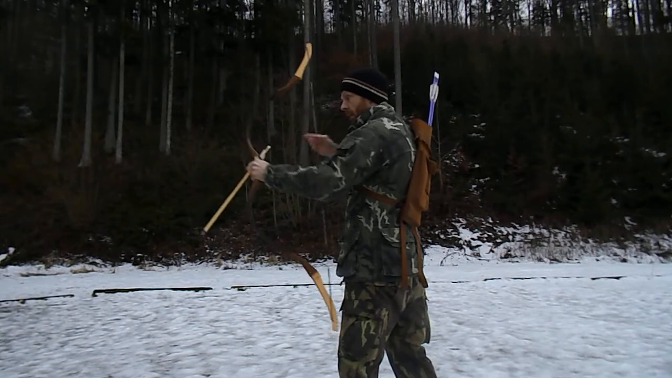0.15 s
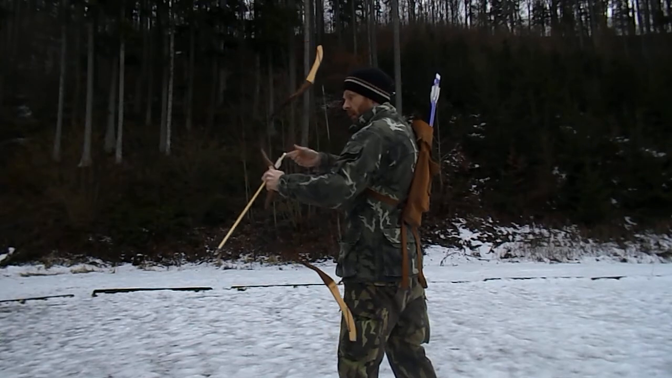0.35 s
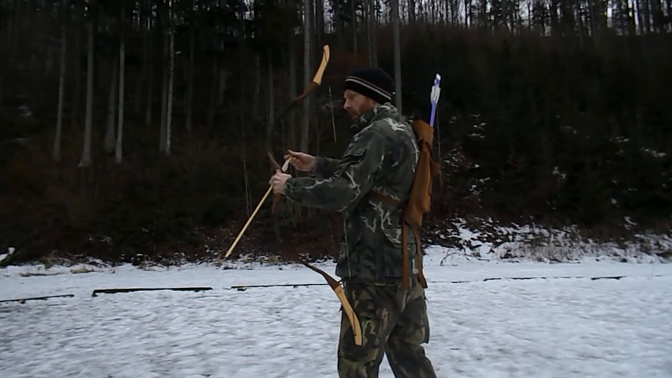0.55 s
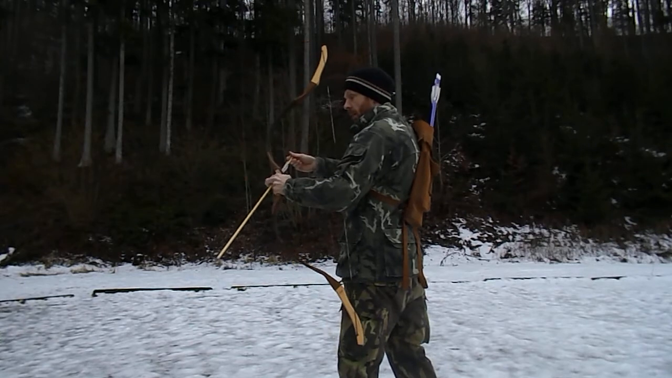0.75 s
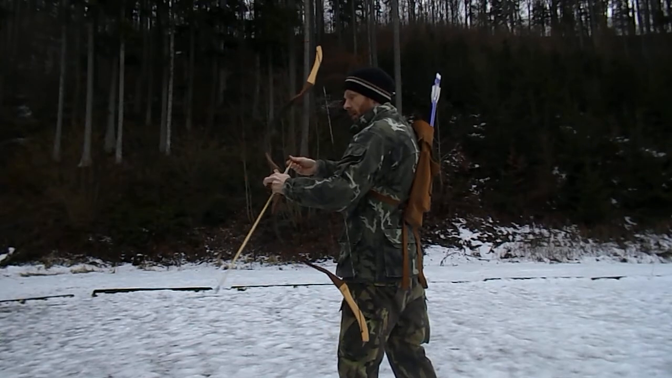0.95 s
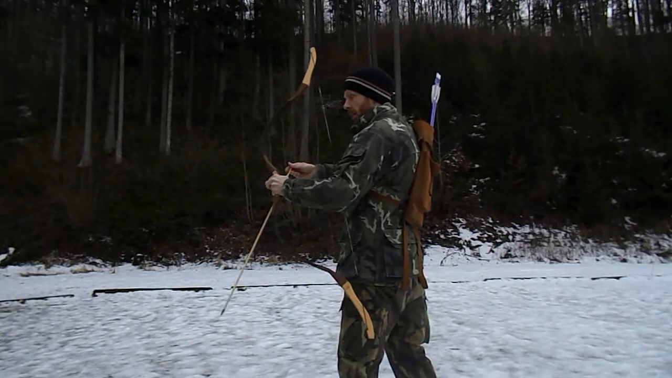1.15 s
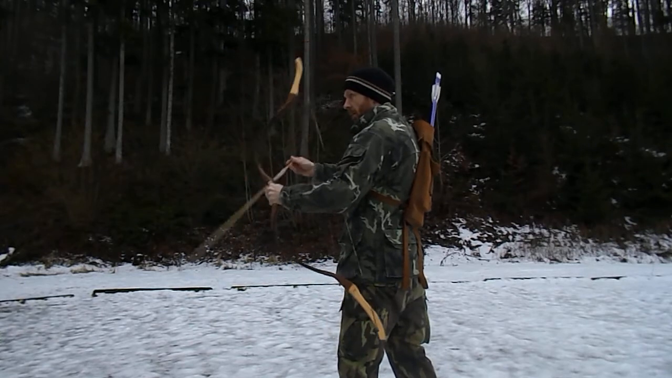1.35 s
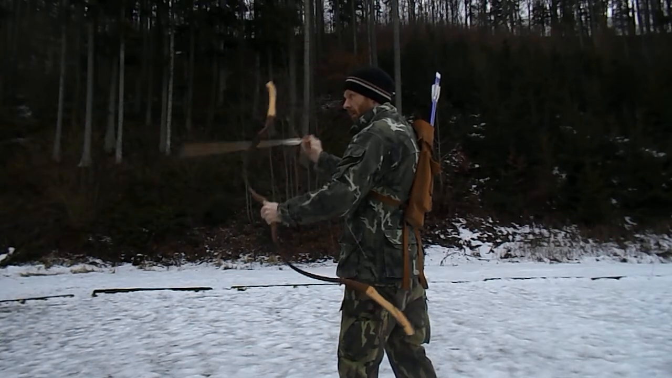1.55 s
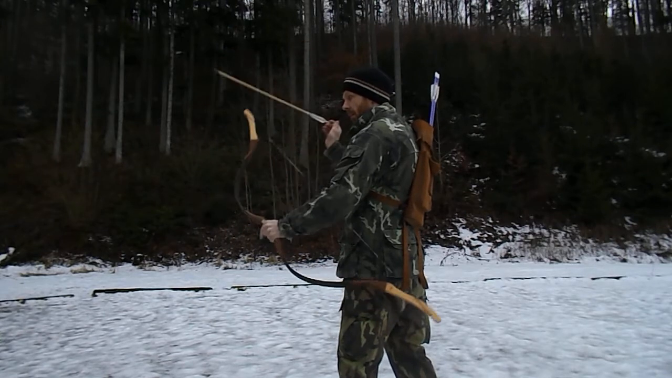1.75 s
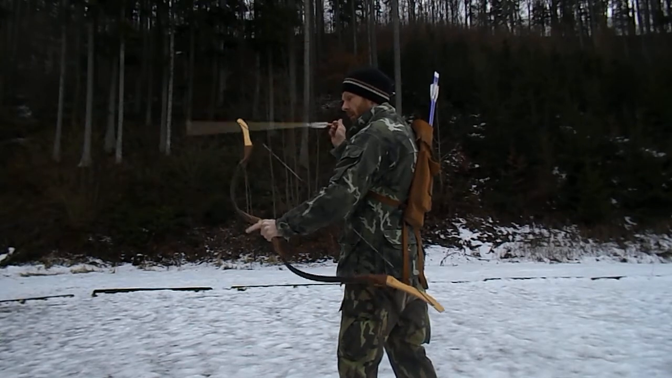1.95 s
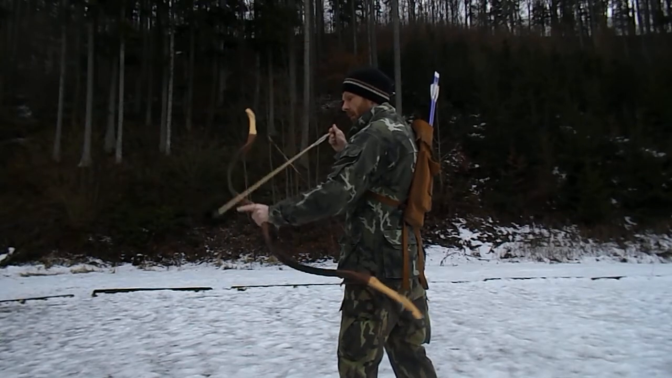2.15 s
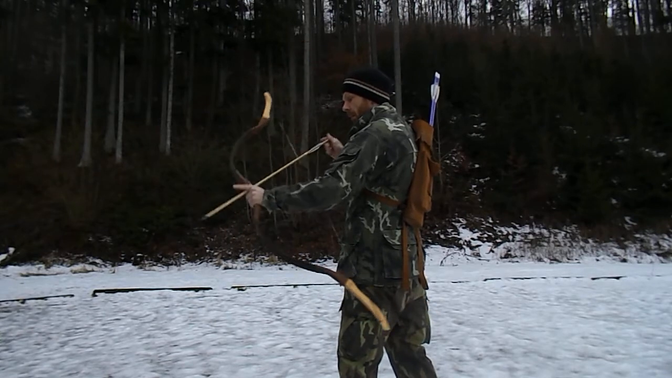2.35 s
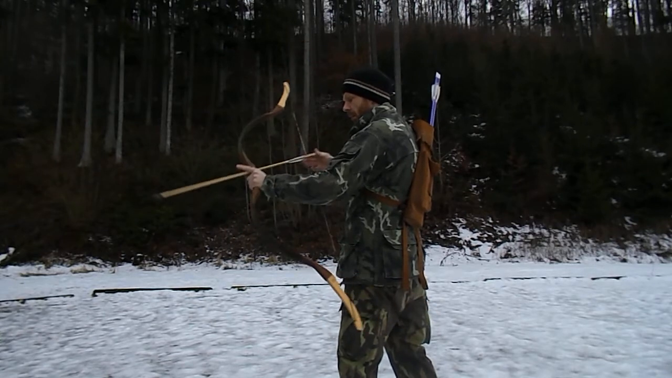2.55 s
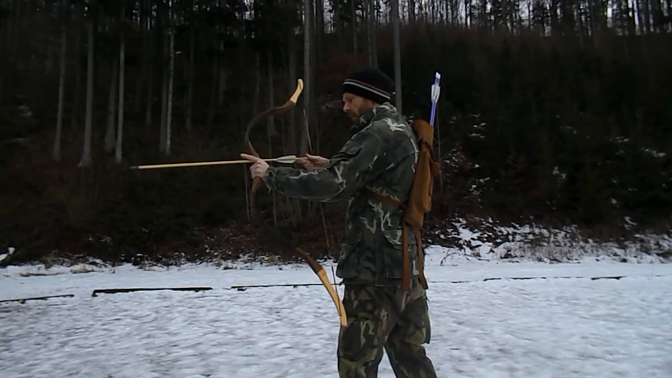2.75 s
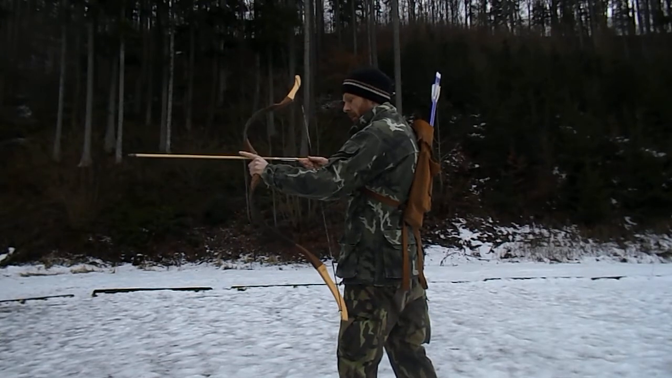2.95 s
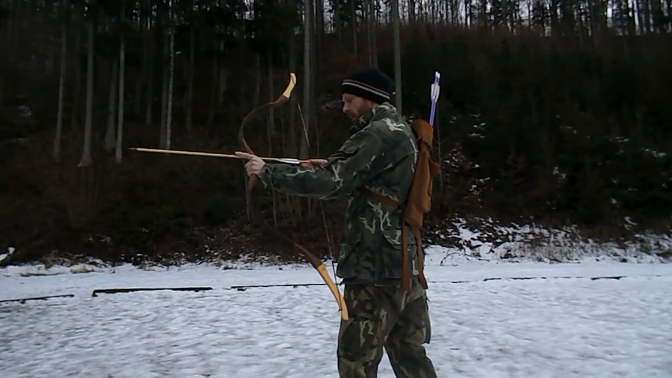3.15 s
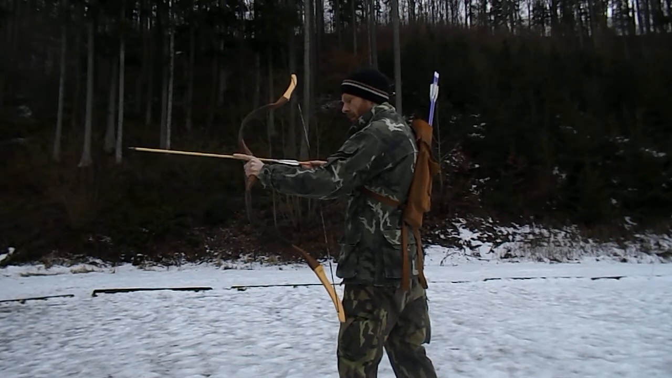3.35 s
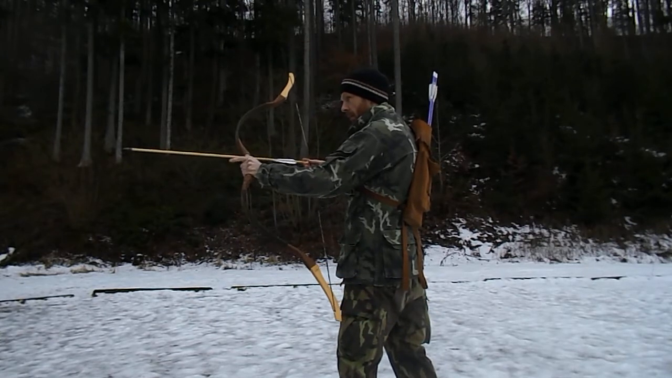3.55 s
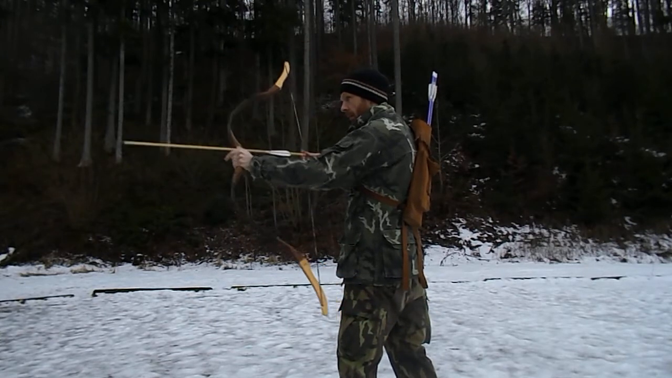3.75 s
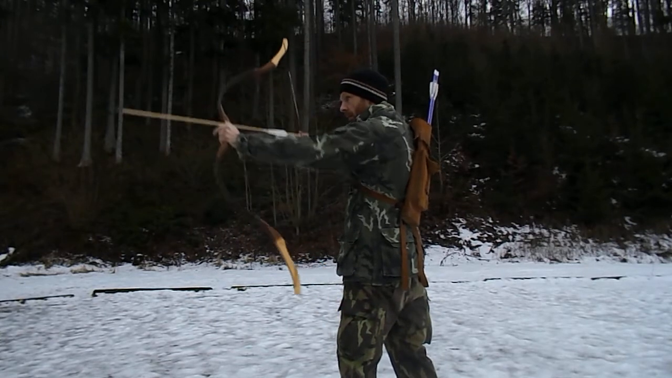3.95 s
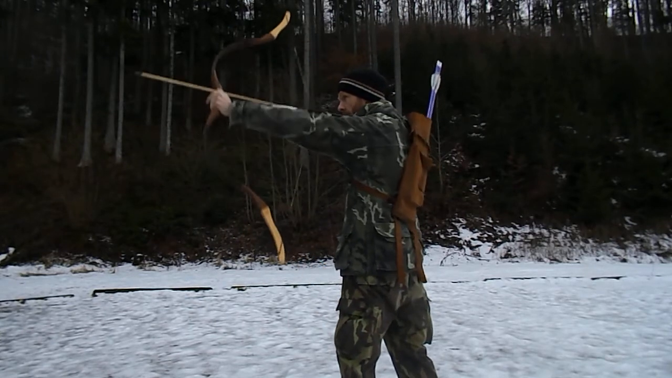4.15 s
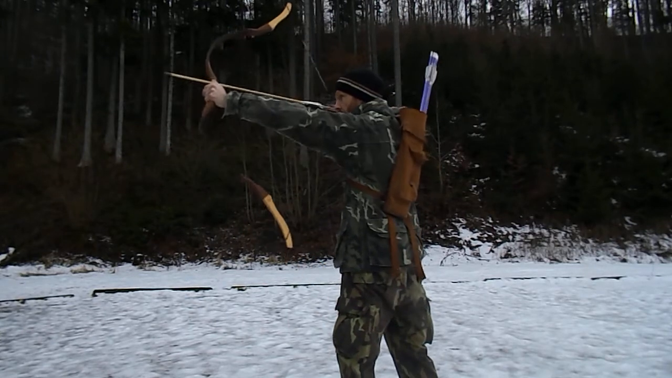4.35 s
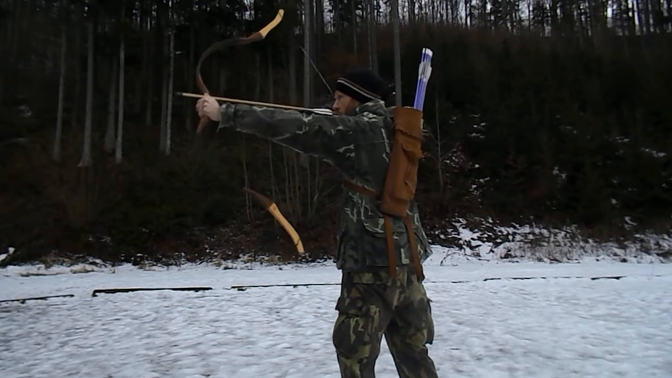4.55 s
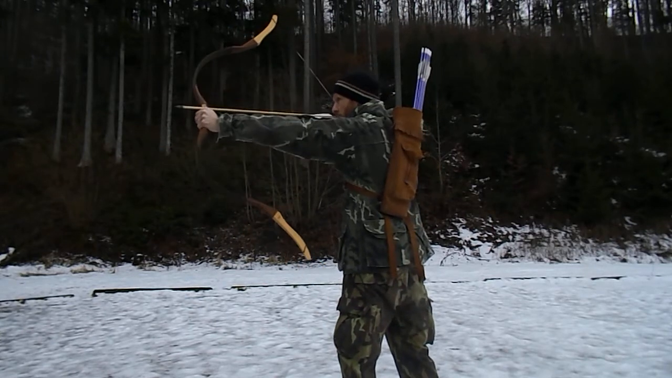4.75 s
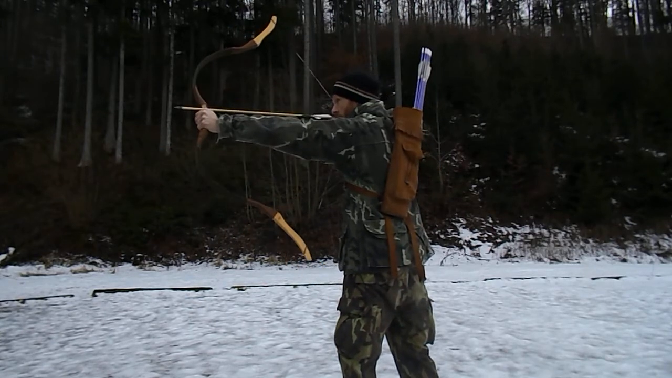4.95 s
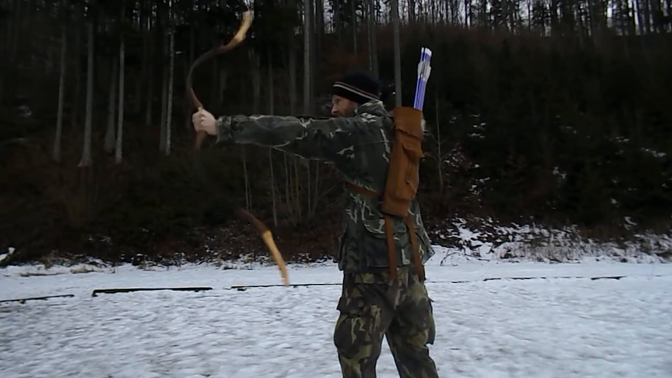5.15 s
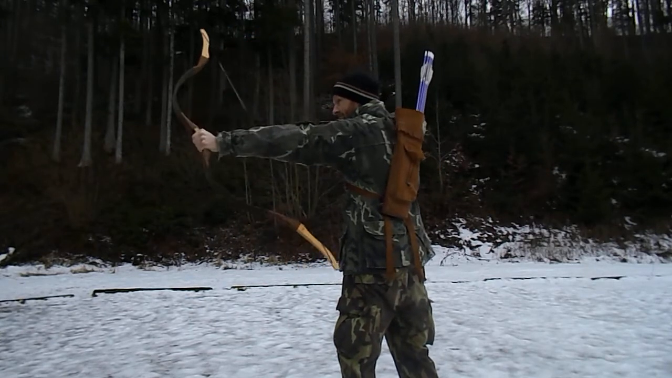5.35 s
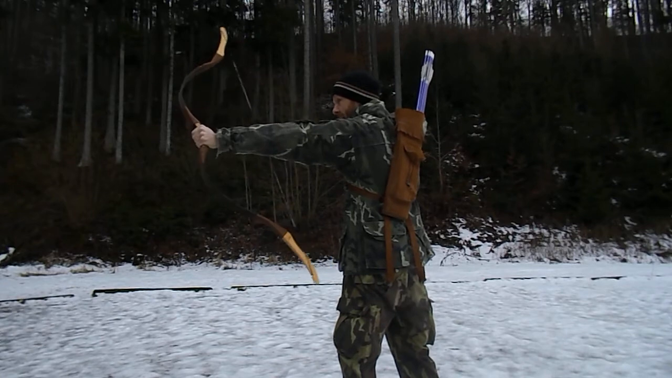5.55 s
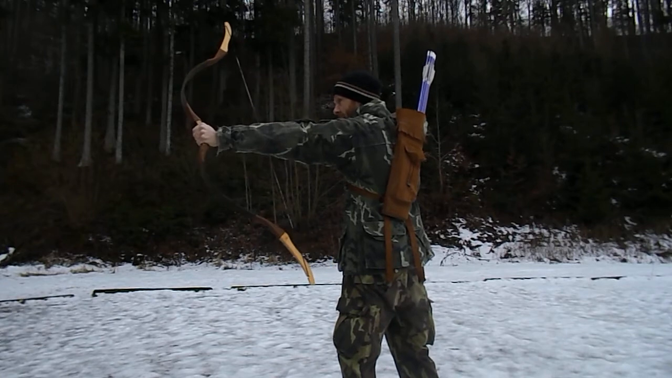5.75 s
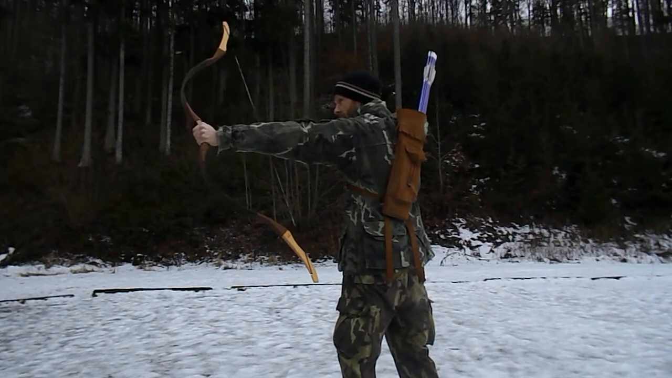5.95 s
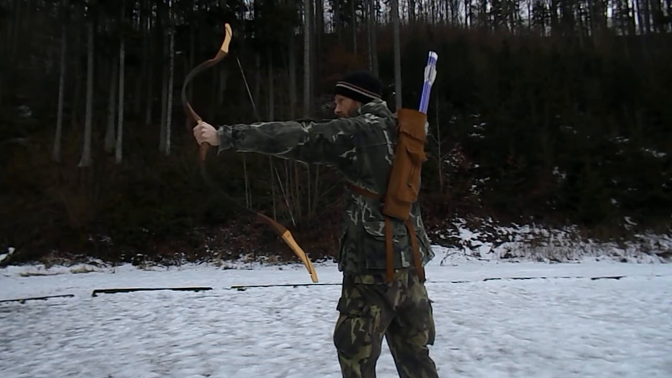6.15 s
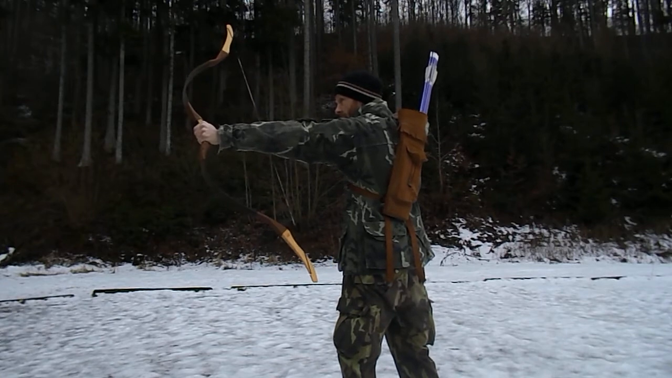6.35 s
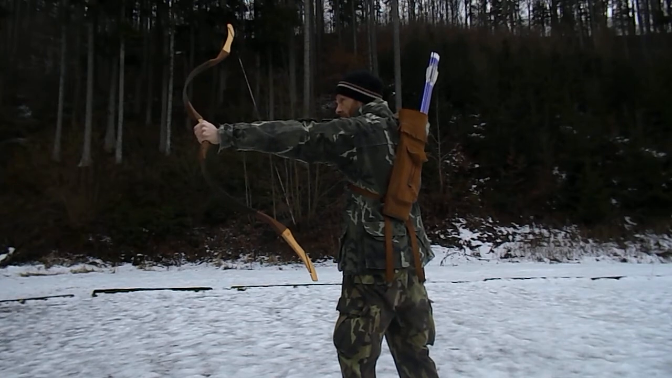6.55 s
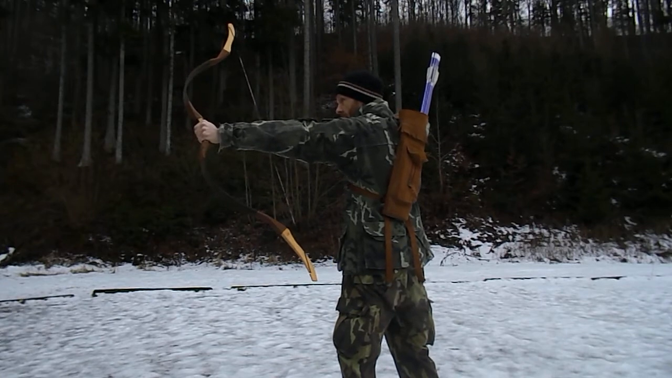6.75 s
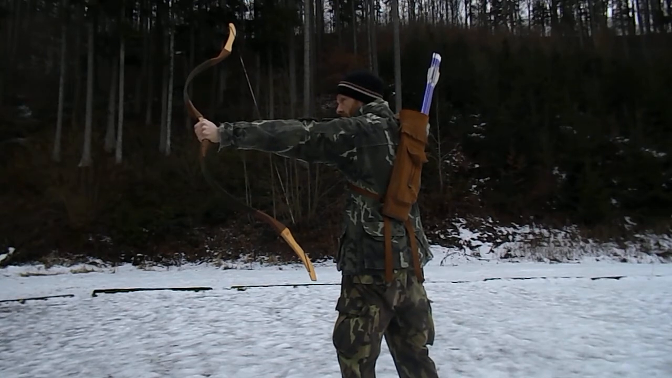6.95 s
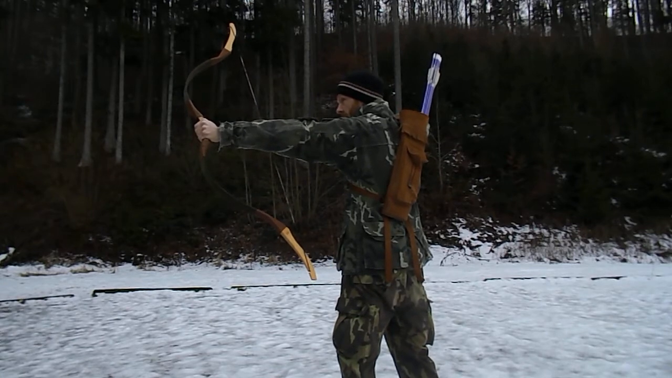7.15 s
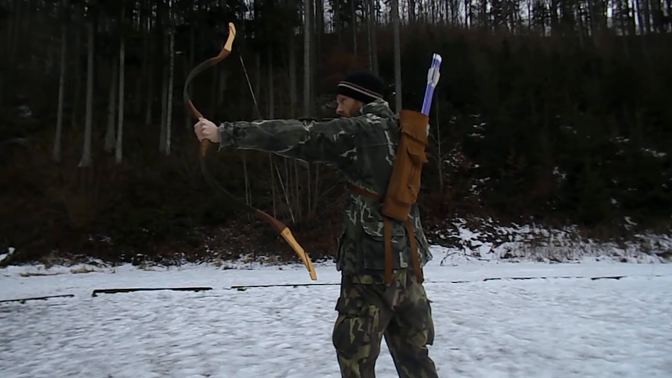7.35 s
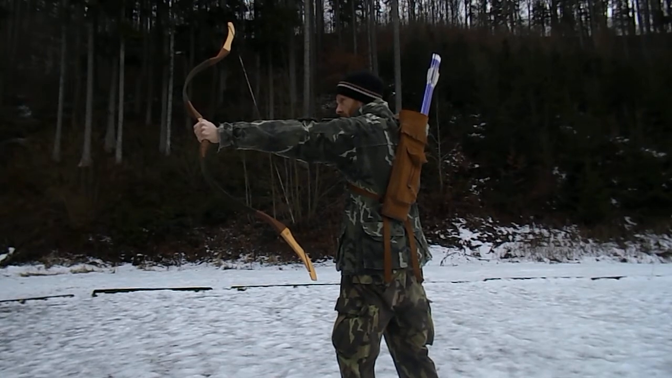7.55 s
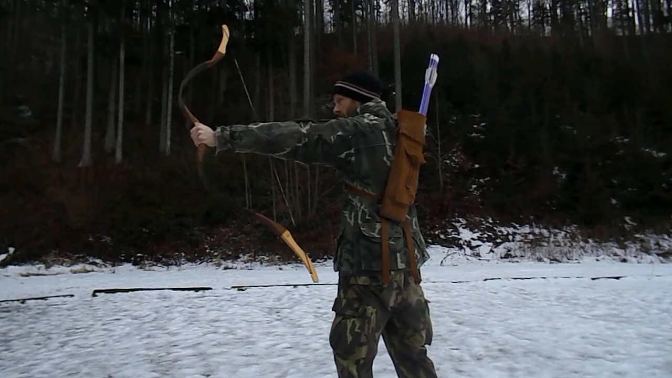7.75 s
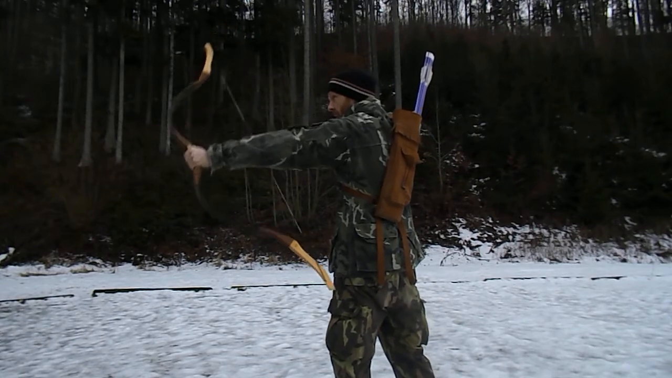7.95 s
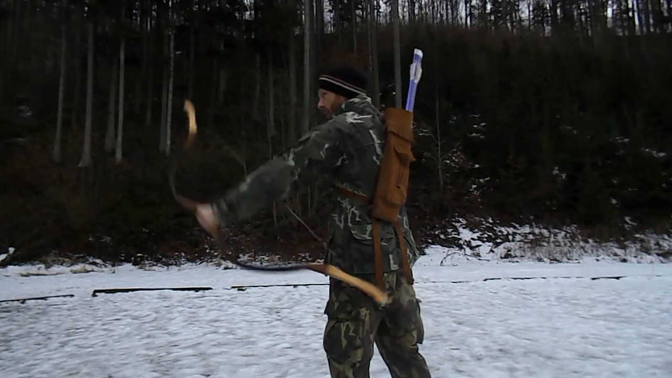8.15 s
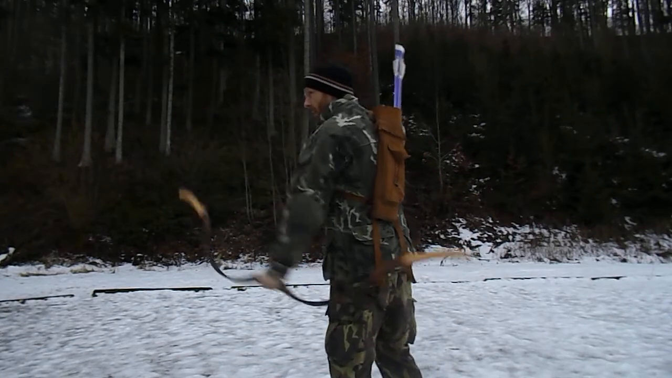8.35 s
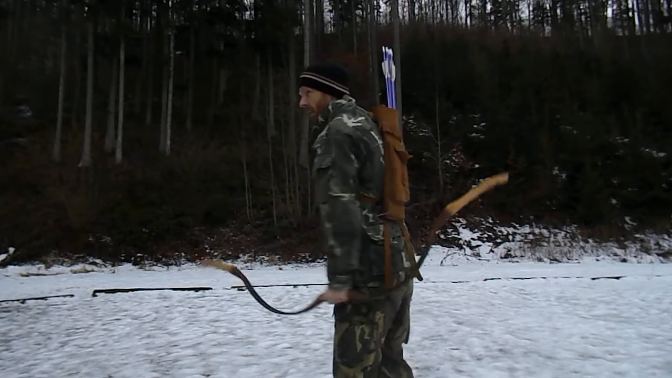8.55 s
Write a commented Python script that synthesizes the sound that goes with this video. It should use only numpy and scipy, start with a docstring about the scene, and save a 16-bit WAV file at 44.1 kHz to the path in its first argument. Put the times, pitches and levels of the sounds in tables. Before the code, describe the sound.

Soft, steady air rush and camera hiss last throughout, in an open place beside woods. Near 0.9 s comes a faint wooden tap with dull low bumps on the camera; a weak buzzy bird note at 1.5 s and more soft bumps toward 2 s. At 2.25 s the arrow shaft clacks crisply on the bow with smaller knocks right after, then tiny nock clicks and feather rustle at 2.4-2.8 s. From 3.3 to 5.4 s a distant bird alternates a thin, high whistle and a short trilled buzz, over slight clothing rustles. At about 5.2 s the string slaps the limbs in a very loud, sharp, woody snap; at 5.27 s the arrow thuds into a close target and rattles out by 5.45 s, leaving a faint woodland tail. Faint pips and rustles follow at 6.2-7.7 s; the bird returns from 8 s, with a brighter rustle at 8.55 s.

```python
"""Air and camera hiss run throughout at a snowy forest edge. At first an archer's wooden arrow knocks on the bow and dull
bumps hit the camera. A far bird starts repeating its two notes, made of gliding sine waves; nock, feathers and clothes
click and rustle, made of short noise bursts. Then the string slaps the recurve bow's limbs, and the arrow thuds into
a target close by and rattles: both are runs of contacts that ring resonances. Faint pips, rustles and the bird follow."""
import sys
import numpy as np
from scipy import signal
from scipy.fft import rfft, irfft, next_fast_len
from scipy.io import wavfile
from scipy.ndimage import uniform_filter1d, map_coordinates

SR = 44100
rng = np.random.default_rng(int(sys.argv[2]) if len(sys.argv) > 2 else 0)


def store_wav(level_fs):
    """Save 16-bit WAV to argv[1]."""
    pcm = np.round(np.clip(np.atleast_2d(level_fs), -1, 1) * 32767)
    wavfile.write(sys.argv[1], SR, pcm.T.astype(np.int16))


N = 383096  # length in samples

# Colour of the air and hiss: (f/Hz, relative level/dB)
AIR_COLOUR = [(26, -78), (45, -48), (62, -25.5), (114, -24), (146, -14), (408, -1), (895, -4.5),
              (963, -2.5), (1060, -7), (1290, -5.5), (1500, -9), (4510, -14.5), (10400, -17.5),
              (15700, -20)]
# How alike left and right are in the air: (f/Hz, likeness from 0 to 1)
AIR_LIKENESS = [(60, .65), (180, .37), (550, .5), (1650, .29), (3200, .05), (4500, 0)]
# How far the air leans to the left: (f/Hz, left minus right level/dB)
AIR_LEAN = [(60, 4), (240, 1), (950, 3), (3770, 1), (15000, 0.5)]
# How long the trees' answer lasts: (f/Hz, time to fall 60 dB/s)
WOODS_DECAY = [(200, 0.53), (1000, 0.65), (4000, 0.86), (12000, 0.45)]
# The bird's clear note: (end of its loud part t/s, level/dB, settled f/Hz, length of loud part/s)
WHISTLES = [(3.305, -57.5, 4250, .015), (3.824, -57, 4280, 0.067), (4.295, -53, 4230, 0.042),
            (4.792, -46.5, 4235, 0.035), (8.006, -55, 4240, 0.013), (8.5, -47.5, 4240, 0.021)]
# The bird's buzzy note: (t/s, starting f/Hz, level/dB)
BUZZES = [(1.52, 4820, -53), (3.455, 4930, -52), (3.945, 4840, -50), (4.427, 4930, -46.5),
          (4.93, 4700, -48), (5.43, 4750, -53), (8.152, 4750, -52.5), (8.625, 4780, -46.5)]
# Dull bumps at the camera: (t/s, level/dB, push length/s)
BUMPS = [(0.962, -32.5, 0.00044), (0.982, -43, .0007), (1.729, -47, 0.0013), (1.973, -56, .0013),
         (2.01, -51, .0014)]
# Thin clicks of nock and feathers: (t/s, level/dB)
CLICKS = [(2.392, -31), (2.551, -32), (2.565, -30), (2.5735, -29), (2.603, -26), (2.611, -29), (2.687, -32)]
# Soft rustles of feathers and clothes: (t/s, level/dB, time to fall 60 dB/s, centre f/Hz)
RUSTLES = [(1.475, -46, .04, 10500), (2.50, -48.5, .5, 8400), (2.655, -43, .11, 8450),
           (2.695, -28.5, .04, 7740), (2.731, -42.5, .12, 7000), (3.305, -42, .04, 3600),
           (3.522, -42.5, .048, 8300), (3.895, -43.5, .047, 11000), (4.545, -36, .16, 4360),
           (5.065, -40, .04, 5480), (6.30, -45.5, .05, 9730), (7.172, -44.5, .088, 11000),
           (7.722, -46, .064, 9300), (8.5464, -27.5, .038, 7000)]
# Faint narrow pips: (t/s, level/dB, centre f/Hz)
PIPS = [(6.262, -46, 2400), (6.597, -39.5, 3350), (6.656, -45, 2280), (6.829, -44, 3200)]
# The arrow's shaft knocking on the bow:
# (t/s, level/dB, time to fall 60 dB/s, treble level/dB, grip as a factor on the shaft's widths)
KNOCKS = [(0.931, -44, 0.022, -20, 0.82), (2.242, -17, 0.0054, 1, 0.71), (2.3109, -22, 0.02, -3, 1.2),
          (2.337, -31, .008, -6, 1.4), (2.6994, -34.5, 0.045, -8, 2.2), (2.7567, -38.5, 0.0061, 13, 5.4)]
# Resonances of the wooden shaft: (f/Hz, width before the grip/Hz, level/dB)
SHAFT_MODES = [(567, 126, -1), (883, 43, 4), (1340, 86, -2.5), (1590, 86, -2), (2180, 1140, -0.5),
               (2790, 49, 7.5), (3090, 130, 0.5)]
# The string slips off the fingers, slaps the limbs and rebounds, one row for each run of contacts:
# (t/s, peak level/dB, build-up/s, swell/dB, settling time/s, length/s, thump level/dB, treble level/dB)
STRING_SLAPS = [(5.161, -18.5, 0.011, 18, 0.0068, 0.021, 2.5, -2),
                (5.1862, 1.5, .0012, 8, 0.002, .010, -11, -4), (5.196, -13.5, 0.0027, 8, 0.015, .058, 7, 2)]
# Resonances of limbs and riser: (f/Hz, width/Hz, level/dB)
BOW_MODES = [(322, 35, 7.5), (447, 92, 2), (550, 65, 1), (656, 160, -3), (829, 45, 9), (1130, 51, 6.5),
             (1270, 70, 6.5), (1700, 220, 6), (2294, 106, 11), (2420, 140, 10), (2690, 300, 6.5),
             (3170, 260, 7.5), (3840, 1070, 5), (5540, 580, -17)]
# The arrow tears into the target, then its shaft shakes:
# (t/s, peak level/dB, build-up/s, swell/dB, settling time/s, length/s, thump level/dB, treble level/dB)
TARGET_HITS = [(5.2697, -3, 0.0041, 8, .005, 0.056, 6, 11),
               (5.327, -18.5, .008, 26, 0.0072, 0.028, -15, 13.5),
               (5.368, -41, 0.0036, 8, .01, .016, -12, 13), (5.397, -46, .002, 6, .006, .012, -12, 0),
               (5.4126, -38.5, .0005, 5.1, .004, 0.014, 1, 13.5)]
# Resonances of the target: (f/Hz, width/Hz, level/dB)
TARGET_MODES = [(301.6, 100, -2.5), (357, 115, 5.5), (470, 240, 0), (614, 126, 3), (890, 180, -6),
                (1196, 120, 4), (1620, 120, 1), (1860, 165, -6.5), (2940, 730, 3.5), (4800, 900, 4)]

AIR_DB = -49.5
# The whistle swells to its loud part, drops, then lingers faintly.
NOTE_RISE_S, NOTE_RISE_DB = 0.055, 20
NOTE_CUT_S, NOTE_CUT_DB = 0.027, 10
NOTE_TAIL_S, NOTE_TAIL_DB = 0.11, 5
BUZZ_S = 0.069
CLICK_T60_S, CLICK_HZ, CLICK_WIDTH_HZ = 0.006, 7500, 15000
RUSTLE_WIDTH = 0.55  # share of the centre frequency
PIP_T60_S, PIP_WIDTH_HZ = 0.047, 320
KNOCK_THUMP_DB = 9.5
# "Doubling" means each doubling of 1 + time since the peak / settling time.
SETTLE_DB = 11.5  # loss each doubling
FIRST_THUMP_LOSS_DB, THUMP_GROWS_DB = 3, 2.5  # missing at the first contact; gained each doubling
RING_GAPS, RING_S = 3.3, 0.0085  # a contact rattles for this many gaps plus this long
TOP_HZ = 15900  # nothing is kept from here up


def amp(db):
    """Turns dB into a gain."""
    return 10 ** (np.asarray(db) / 20)


def unit(x):
    """Scales a sound to an average (rms) size of 1."""
    return x / np.sqrt(np.mean(x ** 2) + 1e-20)


def along(points, hz):
    """Reads values between (Hz, value) points on a log frequency axis."""
    f, value = np.transpose(points)
    return np.interp(np.log(hz + 1), np.log(f + 1), value)


def filtered(x, response):
    """Multiplies the spectrum of x by a response that depends on frequency."""
    n = np.shape(x)[-1]
    padded = next_fast_len(n + 8192)  # room for ringing past the end
    spectrum = rfft(x, padded) * response(np.fft.rfftfreq(padded, 1 / SR))
    return irfft(spectrum, padded)[..., :n]


def modes(table):
    """Resonances that ring after a push: the narrower, the longer; neighbours have opposite signs."""
    def response(f):
        return sum((-1) ** k * amp(db) * 1j * f * width / (hz * hz - f * f + 1j * f * width)
                   for k, (hz, width, db) in enumerate(table))
    return response


def add(out, x, start_s):
    """Mixes x into out from start_s seconds on."""
    part = out[..., round(start_s * SR):][..., :x.shape[-1]]
    part += x[..., :part.shape[-1]]


def placed(x, lead, pan_db):
    """Puts a sound to one side: the left hears it lead seconds earlier and pan_db louder."""
    side = np.array([[.5], [-.5]])
    return filtered(x, lambda f: amp(pan_db * side) * np.exp(2j * np.pi * f * lead * side))


def puff(t60, rise, spread):
    """A short gritty noise burst that rises and dies; spread is the share that differs left and right."""
    t = np.arange(SR // 5) / SR
    shape = amp(-60 * t / max(t60, .001)) * (1 - np.exp(-t / rise))
    grit = amp(3.5 * np.repeat(rng.standard_normal(len(t) // 20), 20))  # many tiny contacts of uneven size
    noise = rng.standard_normal((3, len(t))) * shape * grit
    noise *= np.linalg.norm(shape) / np.linalg.norm(noise, axis=1, keepdims=True)
    spread = np.clip(spread, 0, 1)
    shared, separate = noise[0], noise[1:]
    return np.sqrt(1 - spread) * shared + np.sqrt(spread) * separate


def struck(blows, body, gain_db, contact, crack_hz, crack_width_hz, spread):
    """Blows ring a body by a rattle and one soft push each, and add a bright crack."""
    out = np.zeros((2, N))
    u = np.arange(SR // 5) / SR / contact  # time counted in contact lengths
    bright = modes([(crack_hz, crack_width_hz, 0)])
    for s, db, t60, push_db, treble_db in blows:
        # every blow wakes the resonances at new strengths
        ring = modes([(hz, width, level + rng.normal(0, 1.5)) for hz, width, level in body])
        rattle = puff(t60, rise=.04 * t60, spread=0.038)
        rattle = filtered(rattle, lambda f: 1j * f / (900 + 1j * f))  # light contacts hardly move low modes
        force = amp(gain_db) * rattle + amp(push_db) * u * np.exp(1 - u)
        crack = amp(treble_db) * puff(t60, rise=0.055 * t60, spread=spread)
        blow = filtered(force, ring) + filtered(crack, lambda f: bright(f) ** 2)
        add(out, amp(db) * blow, s)
    return out


def flurry(runs, count=10):
    """Each run of contacts, spreading ever further apart, swells to a peak and settles."""
    blows = []
    for s, db, build, swell_db, settle, length, thump_db, treble_db in runs:
        steps = np.arange(count + 1) + np.r_[0, rng.uniform(-.4, .4, count)]  # uneven timing
        t = length * (steps / count) ** 2
        early = np.clip(1 - t / build, 0, 1)
        late = np.log2(1 + np.clip(t - build, 0, None) / settle)
        level = db - swell_db * early - SETTLE_DB * late
        push = thump_db - FIRST_THUMP_LOSS_DB * early + THUMP_GROWS_DB * late
        t60 = RING_S + RING_GAPS * np.diff(t)
        blows += [(s + t[k], level[k], t60[k], push[k], treble_db) for k in range(count)]
    return blows


def air():
    """Far rush and camera hiss: noise with faint patches, its lower part partly shared by left and right."""
    z = signal.stft(rng.standard_normal((2, N)), nperseg=512)[2]
    patches = uniform_filter1d(rng.standard_normal(z.shape[1:]), size=8, axis=0)
    patches = unit(uniform_filter1d(patches, size=14, axis=1))
    pair = signal.istft(z * amp(0.75 * patches), nperseg=512)[1][:, :N]

    def colour(hz):
        angle = np.arccos(np.clip(along(AIR_LIKENESS, hz), -1, 1)) / 2
        return amp(along(AIR_COLOUR, hz)) * [np.cos(angle), np.sin(angle)]

    mid, side = filtered(pair, colour)
    both = np.array([mid + side, mid - side])
    both = filtered(both, lambda hz: amp(along(AIR_LEAN, hz) * [[.5], [-.5]]))
    return amp(AIR_DB) * placed(unit(both), lead=.00008, pan_db=-1.5)


def woods(x):
    """The trees answer with a noisy tail in which each frequency dies at its own speed."""
    hz, t, z = signal.stft(rng.standard_normal((2, SR // 2)), SR, nperseg=256)
    fading = z * amp(-60 * t / along(WOODS_DECAY, hz)[:, None])
    tail = signal.istft(fading, SR, nperseg=256)[1]
    late = np.pad(x, (400, 0))[None]  # the answer starts 400 samples late
    return signal.fftconvolve(late, tail / np.linalg.norm(tail[0]), axes=1)[:, :N]


def whistles():
    """The clear note is a sine wave that slides up to its pitch and wavers."""
    out = np.zeros(N)
    for peak_s, peak_db, hz, hold in WHISTLES:
        s = peak_s + np.array([-hold - NOTE_RISE_S, -hold, 0, NOTE_CUT_S, NOTE_CUT_S + NOTE_TAIL_S])
        db = peak_db - np.array([NOTE_RISE_DB, 0, 0, NOTE_CUT_DB, NOTE_CUT_DB + NOTE_TAIL_DB])
        t = np.arange(0, s[-1] - s[0], 1 / SR)
        waver = map_coordinates(rng.standard_normal(size=24), [t * 70])  # as if echoes beat with the note
        edge = np.clip(np.minimum(t, t[-1] - t) / 0.0092, 0, 1)
        pitch = hz - 90 * np.exp(-t / .045) + 18 * waver
        loudness = edge * amp(np.interp(t + s[0], s, db) + 4 * waver)
        add(out, loudness * np.sin(2 * np.pi * np.cumsum(pitch) / SR), s[0])
    return out


def buzzes():
    """The buzzy note is a sinking sine wave whose pitch a fast trill swings up and down."""
    out = np.zeros(N)
    for s, hz, db in BUZZES:
        t = np.arange(0, BUZZ_S, 1 / SR)
        drift = map_coordinates(rng.standard_normal(size=16), [t * 90])  # the pitch is not quite steady
        trill = np.sin(2 * np.pi * rng.normal(239.0, 3.7) * t)
        pitch = hz - 1800 * t + 60 * drift + 280 * trill
        loudness = amp(db) * np.sin(np.pi * t / BUZZ_S) ** 0.34
        add(out, loudness * np.sin(2 * np.pi * np.cumsum(pitch) / SR), s)
    return out


def bird():
    """A far bird sings both notes; the trees answer the buzzy one."""
    buzz = buzzes()
    return placed(np.tile(whistles() + buzz, (2, 1)), lead=.00008, pan_db=-4.5) + amp(-9.0) * woods(buzz)


def bumps():
    """Each bump is one low push on the camera, stronger on the right."""
    out, t = np.zeros((2, N)), np.arange(SR // 10) / SR
    for s, db, length in BUMPS:
        u = t / length
        add(out, -amp(db + np.array([[-3.5], [3]])) * u * (2 - u) * np.exp(-u), s)
    return out


def ticks():
    """Clicks, rustles and pips are noise puffs, each in one band; long ones swell in softly."""
    out = np.zeros((2, N))
    rows = [(s, db, CLICK_T60_S, CLICK_HZ, CLICK_WIDTH_HZ) for s, db in CLICKS]
    rows += [(s, db, t60, hz, RUSTLE_WIDTH * hz) for s, db, t60, hz in RUSTLES]
    rows += [(s, db, PIP_T60_S, hz, PIP_WIDTH_HZ) for s, db, hz in PIPS]
    for s, db, t60, hz, width_hz in rows:
        pan_db = -9 * hz / 10000  # the camera body shades the left, more so in the treble
        band = modes([(hz, width_hz, 0)])
        narrow = np.sqrt(SR / 3 / width_hz)  # a narrow band keeps the level of a wide one
        tick = filtered(puff(t60, rise=0.036 * t60, spread=0.156), lambda f: band(f) ** 2)
        add(out, amp(db) * narrow * placed(tick, lead=.0001, pan_db=pan_db), s)
    return out


def knocks():
    """The shaft knocks on the bow; a firmer grip widens its resonances, so that it rings shorter."""
    out = np.zeros((2, N))
    for s, db, t60, treble_db, grip in KNOCKS:
        held = [(hz, grip * width, level) for hz, width, level in SHAFT_MODES]
        out += struck([(s, db, t60, KNOCK_THUMP_DB, treble_db)], held, gain_db=6.5, contact=.00004,
                      crack_hz=6100, crack_width_hz=8400, spread=1.0)
    return placed(out, lead=.00006, pan_db=-2.5)


def bow():
    """The string's slaps ring the limbs and riser."""
    sound = struck(flurry(STRING_SLAPS), BOW_MODES, gain_db=3.5, contact=0.00016,
                   crack_hz=7700, crack_width_hz=6100, spread=0.68)
    return placed(sound, lead=.00004, pan_db=-1.0)


def target():
    """The arrow's impact and shaking ring the target."""
    sound = struck(flurry(TARGET_HITS), TARGET_MODES, gain_db=6.5, contact=0.00017,
                   crack_hz=8650, crack_width_hz=12000, spread=0.5)
    return placed(sound, lead=0.0001193, pan_db=-2.0)


def scene():
    """Mixes the near sounds and the trees' answer to them with bird, bumps and air."""
    near = ticks() + knocks() + bow() + target()
    near = filtered(near, lambda f: 1 / (1 + 1j * f / 18000))  # air and microphone openings dull the top
    return air() + amp(-21.5) * woods(near.mean(axis=0)) + bird() + bumps() + near


def record(dry):
    """The camera rounds off the loudest peaks, thins the bass and drops all above its band limit."""
    clipped = dry / (1 + np.abs(dry) ** 12) ** (1 / 12)
    thin = filtered(clipped, lambda hz: (1j * hz / (60 + 1j * hz)) ** 2)
    return filtered(thin, lambda hz: hz < TOP_HZ)


dry = scene()
out = record(dry)
store_wav(out)
```